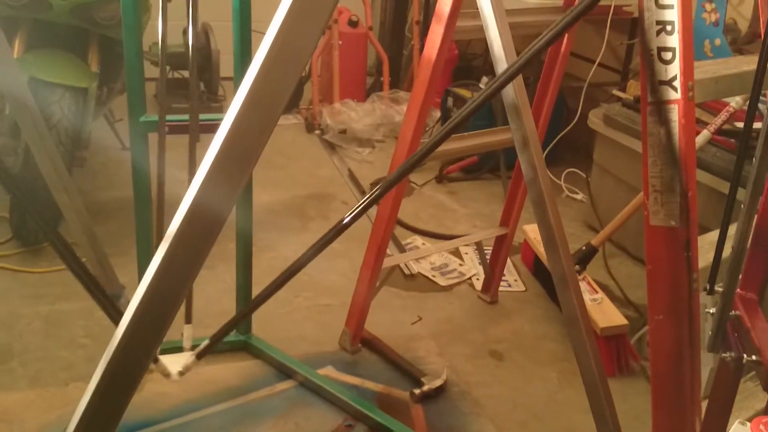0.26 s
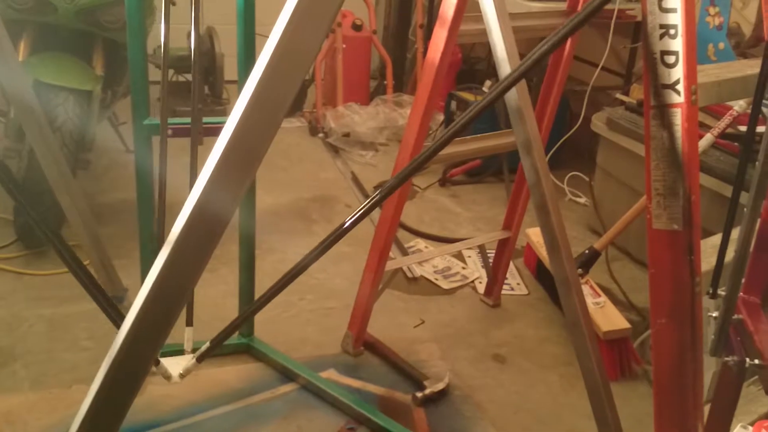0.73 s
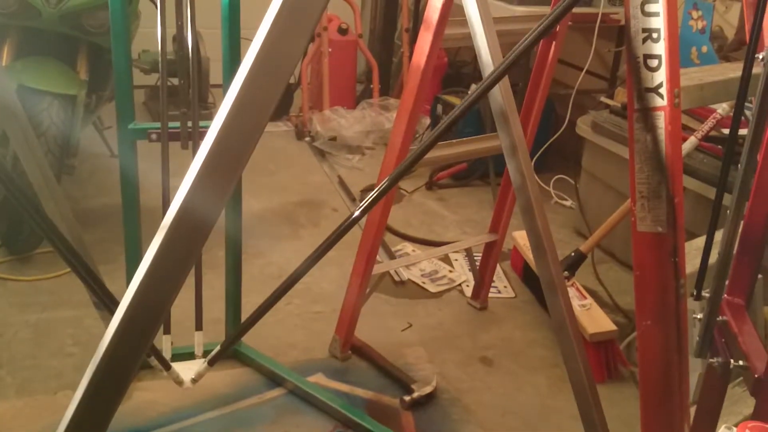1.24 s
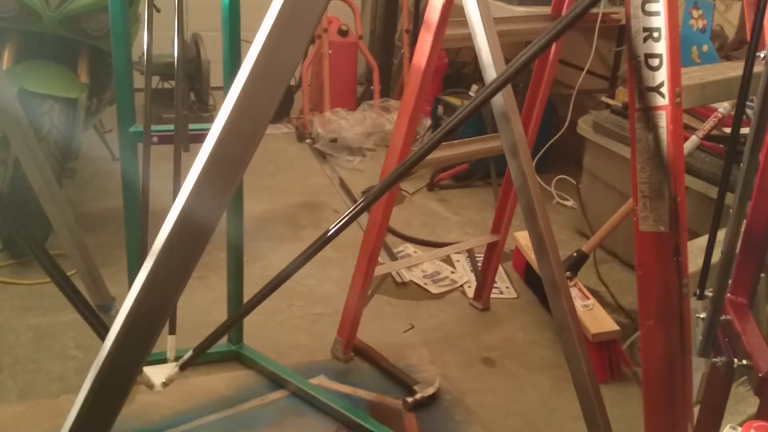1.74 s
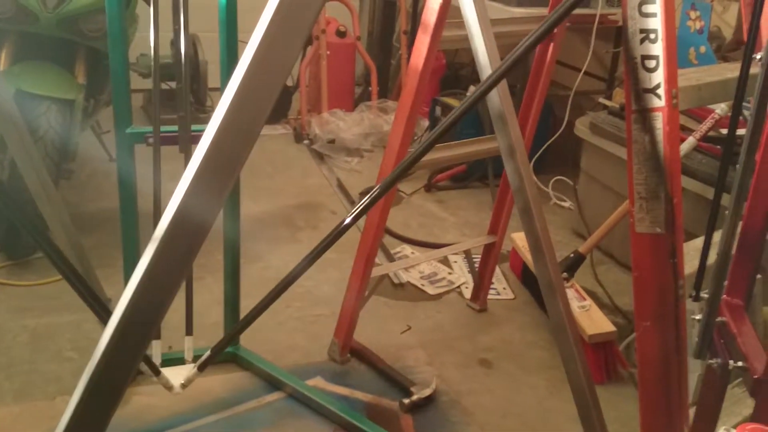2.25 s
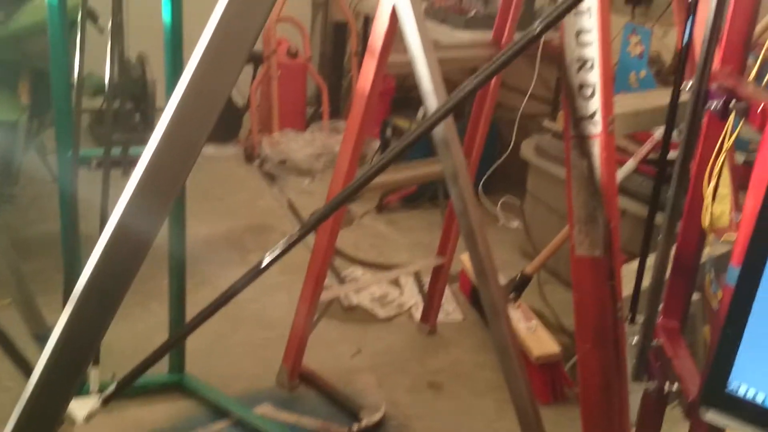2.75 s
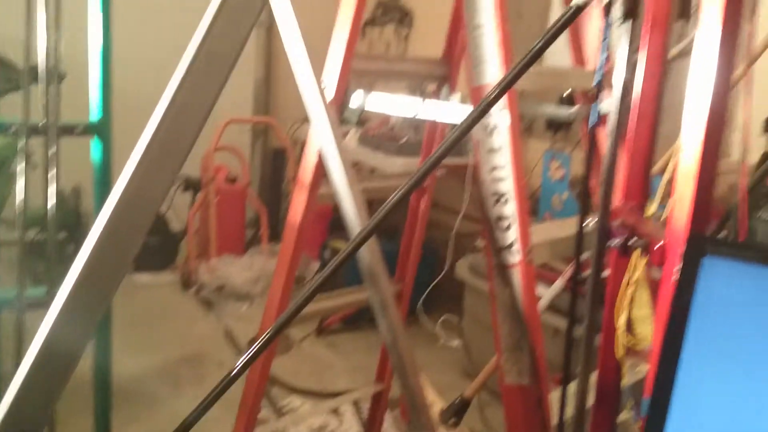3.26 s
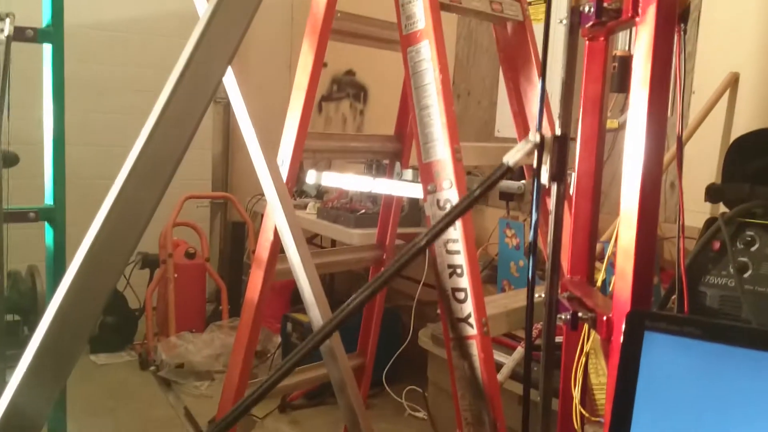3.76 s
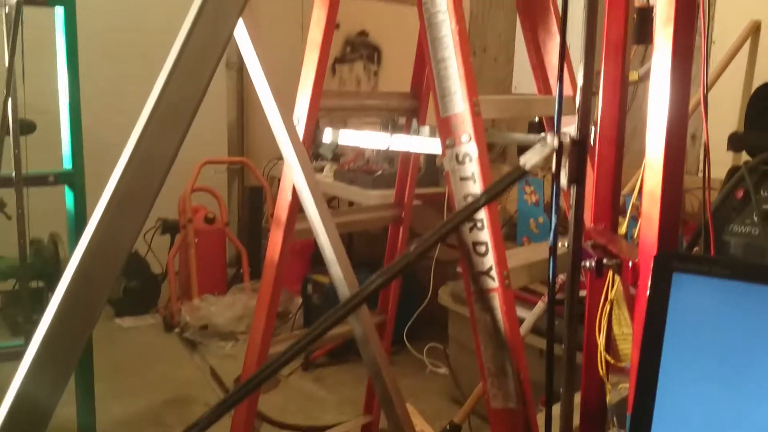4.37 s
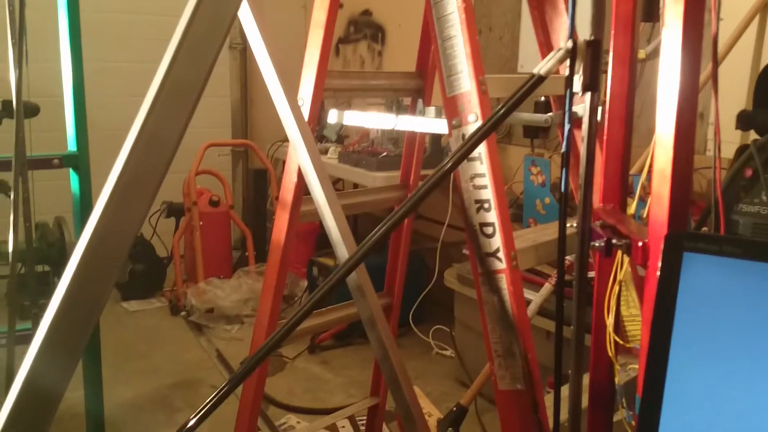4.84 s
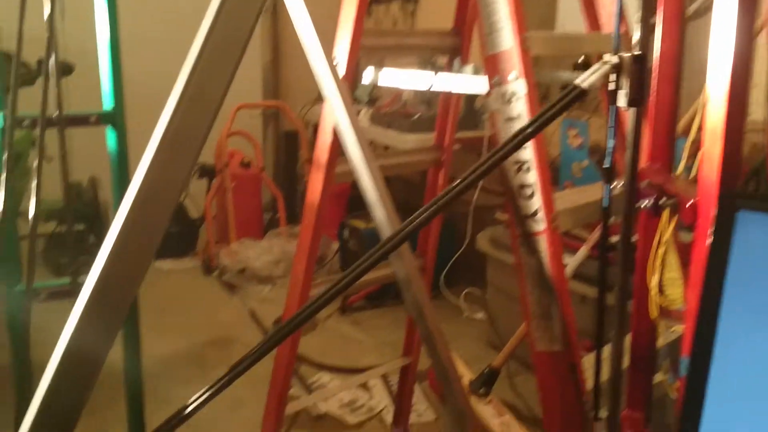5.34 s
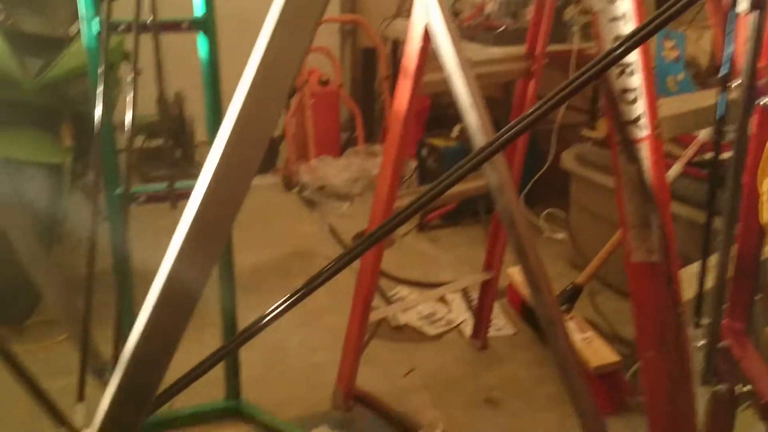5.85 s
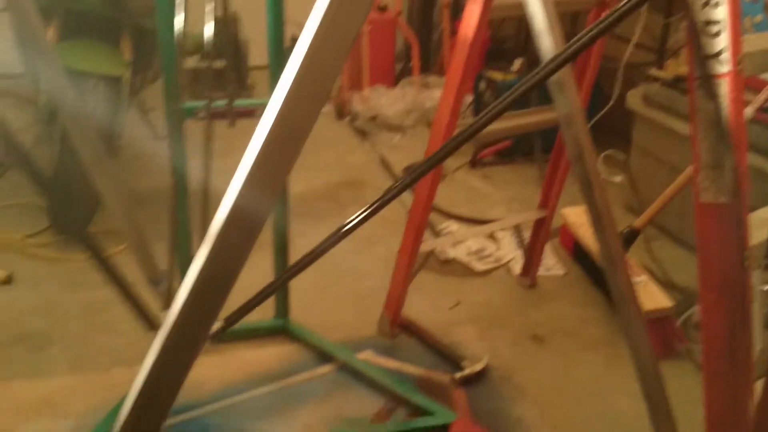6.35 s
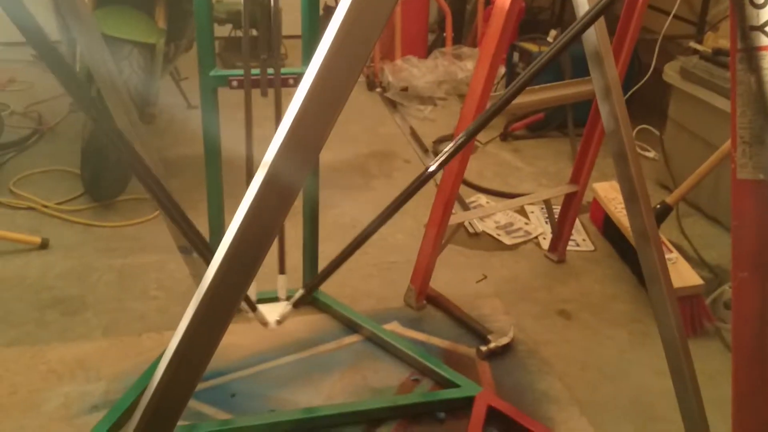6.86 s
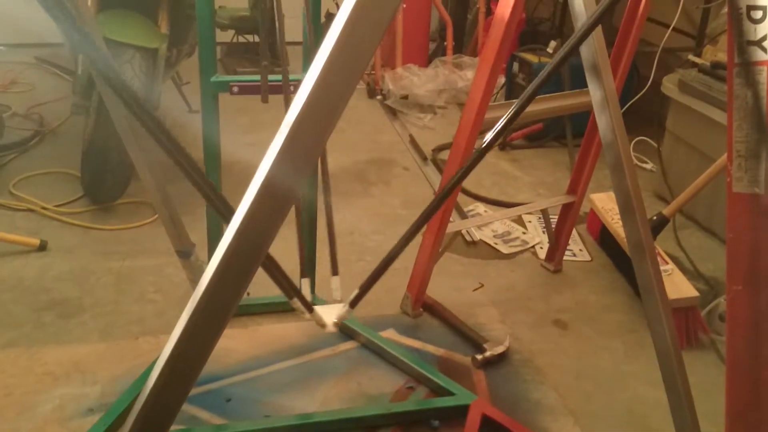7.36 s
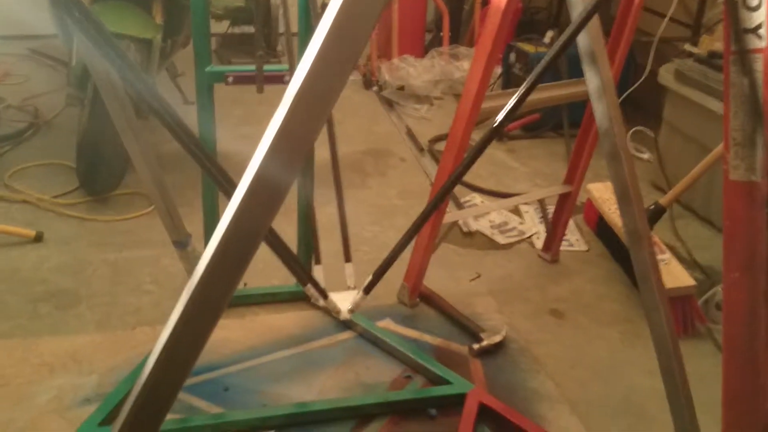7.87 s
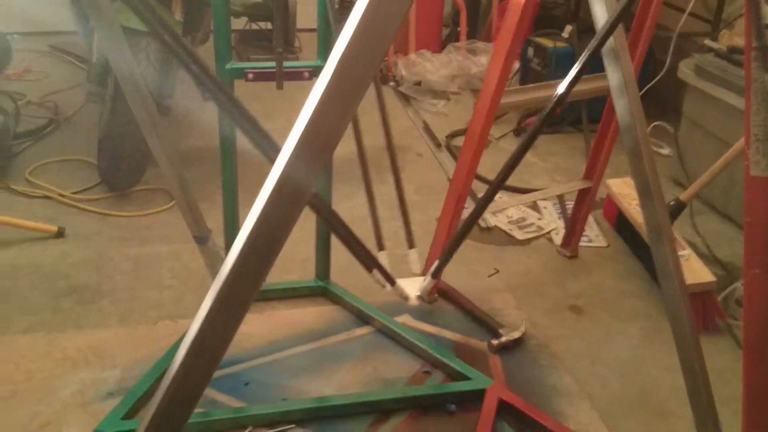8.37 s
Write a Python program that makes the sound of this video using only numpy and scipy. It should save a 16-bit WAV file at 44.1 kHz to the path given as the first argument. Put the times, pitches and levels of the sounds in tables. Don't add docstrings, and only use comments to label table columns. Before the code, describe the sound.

A rod-arm printer's stepper motors whine in short runs, pitch sliding down at each stop and jumping back up, in a garage.

```python
import sys
import numpy as np
from scipy import signal
from scipy.fft import rfft, irfft, next_fast_len
from scipy.io import wavfile
from scipy.ndimage import uniform_filter1d

SR = 44100
rng = np.random.default_rng(int(sys.argv[2]) if len(sys.argv) > 2 else 0)


def volts(x):
    e = np.asarray(x, float) / 20
    return 10 ** e


def to_wav(sig):
    pcm = np.clip(np.atleast_2d(sig), -1, 1) * 32767
    pcm = np.round(pcm).astype(np.int16)
    wavfile.write(sys.argv[1], SR, pcm.T)


N = 379701

STEP_HZ, BEAT_HZ = 1093.75, 178.35


def unit(x):
    return x / np.sqrt(np.mean(x ** 2))


def curves(table):
    s, *columns = np.transpose(table)
    return [np.interp(np.arange(N) / SR, s, c) for c in columns]


def panned(x, pan_db):
    return np.array([x * volts(pan_db / 2), x * volts(-pan_db / 2)])


def walk(rate):
    hold = int(SR / rate)
    steps = np.repeat(rng.standard_normal(N // hold + 1), hold)
    return 1.57 * uniform_filter1d(uniform_filter1d(steps, hold), hold)[:N]


def peaks(hz, modes):
    total = 0
    for k, (mode_hz, width_hz, db) in enumerate(modes):
        total = total + (-1) ** k * volts(db) / (1 + 1j * (hz ** 2 - mode_hz ** 2) / (hz * width_hz))
    return total


def shaped(x, gain):
    size = next_fast_len(N + SR)
    hz = np.arange(size // 2 + 1) * SR / size + 1e-3
    return irfft(rfft(x, size) * gain(hz), size)[..., :N]


def colour(points):
    hz, db = np.transpose(points)
    return lambda f: volts(np.interp(np.log(f), np.log(hz), db))


def add(out, s, sound):
    i = int(s * SR)
    out[:, i:i + sound.shape[1]] += sound[:, :N - i]


# (frequency [Hz], density [dB per Hz])
HISS_COLOUR = [(120, -24), (200, -29), (300, -10.5), (460, -7.5), (1000, -9), (1540, -14.5), (5500, -20),
               (6800, -17.5), (11400, -18.5), (14800, -13), (16500, -7)]
# (time [s], level [dB])
HISS_TURN = [
    (0, -1),
    (1.6, 1),
    (5.5, -0.5),
    (6.2, -2),
    (8.6, 0.5),
]
# (frequency [Hz], density [dB per Hz])
RUMBLE_COLOUR = [(15, -46), (25, -65), (59, 4), (113, -2.5), (156, -3), (188, 2.5), (260, -4.5), (340, -42),
                 (570, -120)]


def air():
    hiss = unit(shaped(rng.standard_normal((2, N)), colour(HISS_COLOUR)))
    shared = 1.1 * rng.standard_normal(N)
    rumble = unit(shaped(rng.standard_normal((2, N)) + shared, colour(RUMBLE_COLOUR)))
    hiss_db = -58 + curves(HISS_TURN)[0] + 0.49 * walk(7) + np.array([[-1], [1]])
    rumble_db = -77.5 + 1.6 * walk(9)
    return volts(hiss_db) * hiss + volts(rumble_db) * rumble


def garage(x):
    t60_s, first_echo_s = 0.56, .006
    t = np.arange(SR) / SR
    tail = rng.standard_normal((2, SR)) * np.exp(-np.log(1000) * t / t60_s) * (t > first_echo_s)
    return signal.fftconvolve(x, tail / np.sqrt(np.sum(tail ** 2) / 2), axes=1)[:, :N]


# (time [s], peak [dB], knock [Hz], t60 [s], thud [dB])
FINGER_BUMPS = [(0.719, -62, 306, 0.039, -6), (1.719, -79, 390, 0.075, 5), (2.749, -68, 308, 0.16, 7),
                (2.859, -49, 366, 0.058, 4), (2.976, -53.5, 393, 0.05, -8), (2.997, -54, 420, 0.062, -11),
                (3.016, -56, 410, 0.051, -12), (3.205, -58, 378, 0.069, -17), (3.247, -63, 405, 0.065, -8),
                (5.271, -76, 300, .1, 14), (5.61, -82, 300, .1, 12), (6.451, -66, 282, 0.032, 9),
                (6.919, -74, 269, 0.071, 13), (7.818, -73, 320, 0.089, 15), (7.89, -77, 323, 0.062, 20),
                (7.999, -81, 320, .08, 12), (8.107, -48.5, 358, 0.036, -7), (8.501, -37, 376, 0.055, 5),
                (8.529, -51.5, 364, 0.092, -1)]


def bumps():
    t, out = np.arange(SR // 4) / SR, np.zeros((2, N))
    port_lead_rad = np.array([[.4], [-.4]])
    for s, db, hz, t60, thud_db in FINGER_BUMPS:
        skin = rng.standard_normal(len(t)) + 0.74 * rng.standard_normal((2, len(t)))
        scuff = uniform_filter1d(uniform_filter1d(skin, size=24), size=16)
        press = np.minimum(t / 0.0035, 1) ** 2
        fall = press * np.exp(-np.log(1000) * t / t60)
        knock = panned(fall ** 1.4 * -np.cos(2 * np.pi * hz * (t - 0.0036)), 7) + 1.5 * fall * scuff
        sway = np.cos(2 * np.pi * 72 * t * (1 - 1.5 * t) - 1.9 + port_lead_rad)
        thud = -volts(thud_db - 6) * fall ** 0.6 * sway
        add(out, s, volts(db + 7.5) * (knock + thud * volts([[-1.5], [1.5]])))
    return shaped(out, lambda f: (1j * f / 40) ** 2 / (1 + 1j * f / 40) ** 2)


# (time [s], peak [dB], ring [Hz], t60 [s],
# left minus right [dB])
JOINT_TICKS = [(.7205, -41.5, 1500, 0.018, 1), (1.4437, -45, 5700, 0.027, -11), (1.4438, -42, 9200, .02, 2),
               (1.4446, -46.5, 2520, 0.033, 5), (1.4498, -46.5, 5200, .015, -14),
               (1.449, -48, 8800, 0.018, 0), (1.4518, -45, 2700, 0.019, 9), (1.8494, -45, 2620, 0.1, 5),
               (5.9805, -54, 5000, .02, -3), (5.9859, -41, 4700, 0.013, -7), (5.987, -42, 1090, .03, -3),
               (5.9982, -48, 5010, 0.025, -1), (6.006, -47.5, 1500, 0.021, -3),
               (6.050, -54, 3100, 0.035, -11), (7.8445, -50.5, 4900, 0.025, -14),
               (7.845, -45.5, 9300, 0.011, 0), (7.857, -51, 5000, .02, 0), (7.9381, -40, 4670, 0.016, -5),
               (7.9415, -52, 2400, .02, 0), (7.951, -56, 4500, 0.027, -3), (2.861, -56, 800, .02, 0),
               (3.0, -56, 700, .03, 0), (8.502, -42, 1300, 0.017, 0)]


def ticks():
    t, out = np.arange(SR // 8) / SR, np.zeros((2, N))
    for s, db, hz, t60, pan_db in JOINT_TICKS:
        crack = rng.standard_normal(len(t)) + 0.85 * rng.standard_normal((2, len(t)))
        ring = signal.lfilter(*signal.iirpeak(hz, 7, SR), crack)
        fall = volts(db - 10.5) * np.exp(-np.log(1000) * t / t60)
        add(out, s, panned(fall, pan_db) * (0.6 * crack + 8 * ring))
    return shaped(out, colour([(500, -12), (1000, 5), (3000, 1), (9500, -5), (12000, -12), (16000, -45)]))


# (time [s], length [s], pitch [Hz], level [dB])
ROLLER_DRAGS = [
    (3.67, .17, 2175, -63),
    (3.7, 0.15, 2050, -65),
    (7.53, 0.085, 2270, -58),
]


def drags():
    out, waver = np.zeros((2, N)), walk(30.25)
    for k, (s, length, hz, db) in enumerate(ROLLER_DRAGS):
        t = np.arange(int(length * SR)) / SR
        own = waver[k * SR:][:len(t)]
        swell = np.sin(np.pi * (t / length) ** 0.6)
        tone = np.sin(2 * np.pi * hz * t + 1.8 * own)
        add(out, s, panned(volts(db + 1 + 2.0 * own) * swell * tone, 0))
    return out


def moves():
    return [-1] + [row[0] for row in STEP_LAUNCHES], [row[0] for row in STEP_BRAKES] + [N / SR]


def cruising():
    starts, stops = moves()
    t = np.arange(N) / SR
    speed = 0
    for a, b in zip(starts[:-1], stops[:-1]):
        speed = speed + np.interp(t, [a + 0.025, a + 0.09, b, b + 0.19], [0, 1, 1, 0])
    return speed


# (fifth harmonic [dB], third harmonic [dB], rail ring [dB], rattle [dB], upper beats [dB])
MOVE_LEVELS = [(-60.5, -58, 0.5, -55.5, -4), (-60, -67, 0.5, -55, 0), (-59.5, -57, 0, -55, -9),
               (-61, -60, -3.5, -55.5, -10), (-60.5, -61, 5, -55.5, -5), (-64, -63, 4.5, -55, -3.5),
               (-57.5, -66, 4.5, -54.5, -8), (-70, -61.5, 4.5, -53.5, -2.5), (-61, -58.5, 2.5, -55.5, -2),
               (-58, -70, 1, -53.5, 3.5), (-58, -66, 3, -55, 4), (-68, -70, -10, -54, 0)]
# (time [s], half length [s], level [dB])
RAIL_SWELLS = [
    (.67, 0.035, 2),
    (2.06, 0.073, 4.5),
    (2.88, .04, 3),
    (6.107, 0.038, -5),
    (3.724, 0.082, 2),
    (4.04, 0.18, -1),
    (7.22, 0.079, 1.5),
    (7.537, 0.052, 2.5),
    (8.354, 0.049, 3.5),
]


def travel():
    t = np.arange(N) / SR
    creep_s, speed_up_s = 0.064, 0.04
    slow_s, halt_s, die_s = 0.11, 0.16, 0.12
    swell_db = sum(db * np.exp(-((t - s) / half) ** 2) for s, half, db in RAIL_SWELLS)
    rattle, fizz = [], []
    for a, b, row in zip(*moves(), MOVE_LEVELS):
        up = a + speed_up_s
        b = max(b, up)
        rattle_s = [a - creep_s - .035, a - creep_s, up, b, b + slow_s, b + halt_s, b + halt_s + die_s]
        rattle.append(row[3] + np.interp(t, rattle_s, [-17, -3.5, 0, 0, 0, -5.5, -17]))
        powered = np.interp(t, [a - .11, a - .08, up, b + 0.21], [-10, -2.5, 0, -.6])
        fizz.append(row[3] - 10.5 + np.where(t > b + 0.14, -10, powered))
    return np.max(rattle, axis=0) + swell_db, np.max(fizz, axis=0) + swell_db


# (frequency [Hz], density [dB per Hz])
RATTLE_COLOUR = [(450, -17), (800, -16.5), (1200, -6), (2400, -5), (3600, -4.5), (5400, 0), (6200, -6.5),
                 (6700, -11.5), (9000, -16)]
# (frequency [Hz], width [Hz], level [dB])
RAIL_MODES = [(1981, 52, 2.5), (2762, 10, 8), (3017, 8, 12.5), (3993, 14, 5.5), (6060, 130, -0.5)]
# (frequency [Hz], density [dB per Hz])
FIZZ_COLOUR = [(3820, -54), (6500, -20), (6770, -13), (7300, -6), (9080, 2), (10900, -3.5), (13400, -8.5),
               (14900, 1), (15500, -29)]


def carriages():
    rattle_db, fizz_db = travel()
    slow = 1 - cruising()
    hum_db = rattle_db + 5 * slow
    drone_db = rattle_db - 29.0 + 14 * slow
    beat = 2 * np.pi * BEAT_HZ * np.arange(N) / SR
    chatter = volts(.3 * np.sin(beat) + .35 * np.sin(2 * beat) + .8 * walk(120) + .7 * walk(12))
    rattle = shaped(chatter * rng.standard_normal((2, N)),
                    lambda f: colour(RATTLE_COLOUR)(f) * (1 + np.abs(peaks(f, RAIL_MODES))))
    shake = rng.standard_normal(N) + 0.13 * rng.standard_normal((2, N))
    panel = colour([(450, -20), (620, 0), (1100, 0), (1400, -20)])
    hum = shaped(shake, lambda f: peaks(f, FRAME_MODES) + volts(-19.5) * panel(f))
    fizz = shaped(chatter ** 1.06 * volts(0.47 * walk(9.8)) * rng.standard_normal((2, N)), colour(FIZZ_COLOUR))
    drone = shaped(shake, lambda f: peaks(f, [(302.0, 45, 0)]) ** 2)
    out = unit(rattle) * volts(rattle_db + np.array([[2.2], [3.2]]))
    out += unit(hum) * volts(hum_db + np.array([[-15], [-12]]))
    out += unit(fizz) * volts(fizz_db + np.array([[1.6], [2.6]]))
    return out + unit(drone) * volts(drone_db + np.array([[2.5], [-1.5]]))


# (time [s], peak [dB], left minus right [dB])
STEP_LAUNCHES = [(0.722, -35, -5), (1.622, -36, -3), (2.103, -35, -2), (2.495, -37.5, -4), (2.94, -35.5, 0),
                 (3.423, -39, -4), (4.423, -39.5, -3.5), (5.108, -37, -4.5), (6.186, -35, -6),
                 (8.08, -34, -5), (8.571, -31.5, -1.5)]
# (time [s], level [dB], left minus right [dB])
STEP_BRAKES = [(.503, -39, -2), (.984, -41, -4.5), (1.834, -42, -6), (2.262, -41.5, -4), (2.709, -41, -6),
               (3.194, -41.5, -4), (4.212, -44, -4.5), (4.854, -41.5, -4.5), (5.439, -43, -4.5),
               (7.535, -43.5, -3), (8.321, -42, -4)]
# (share of the glide rate [ratio], offset [Hz], level [dB])
GLIDE_STRANDS = [(1, 0, 0), (.75, -20, -8), (1.35, -10, -12), (.7, -165, -8), (.8, -330, -21)]
# (frequency [Hz], width [Hz], level [dB])
FRAME_MODES = [(636, 41, -1.5), (825, 31, 2), (904.3, 32.4, 6), (918, 7.1, 4.5), (923, 11, -12),
               (1012, 110, 4), (684, 11.7, 2.5), (970, 17, -3.5)]


def sweeps():
    t, force = np.arange(SR // 3) / SR, np.zeros((2, N))
    launch_hz, launch_s = 930, .032
    lead_in_s, lead_in_db = .022, -15
    ring_up_s = .001
    up_hz = (STEP_HZ - launch_hz) * np.maximum(1 - (t - lead_in_s) / launch_s, 0)
    cut_in = np.interp(t, [0, lead_in_s, lead_in_s + .002], [0, volts(lead_in_db), 1])
    up_fade = np.exp((lead_in_s - t) / .045) * cut_in
    down_hz = 3500 * t
    down_fade = np.exp(-(t / 0.082) ** 3) * np.minimum(t / 0.01, 1)
    launching = (STEP_LAUNCHES, up_hz, up_fade, lead_in_s + ring_up_s)
    braking = (STEP_BRAKES, down_hz, down_fade, 0)
    for events, below_hz, fade, early_s in (launching, braking):
        for s, db, pan_db in events:
            for share, offset_hz, strand_db in GLIDE_STRANDS:
                hz = np.maximum(STEP_HZ + offset_hz - share * below_hz, 50)
                tone = np.sin(2 * np.pi * np.cumsum(hz) / SR + .4 * rng.standard_normal((2, 1)))
                add(force, s - early_s, panned(volts(db + strand_db - 3.5) * fade, pan_db) * tone)
    force *= 1 + .15 * walk(90)
    body = lambda f: 1 / (1 + 1j * (f ** 2 - 1000 ** 2) / (f * 480))
    return shaped(force, lambda f: volts(-6) * peaks(f, FRAME_MODES) + body(f))


# (time [s], step tone [dB], left minus right [dB], belt load [0-1])
NEAREST_MOTOR = [(0, -47, -5.5, 0.07), (.5, -48.5, -3.5, 0), (.8, -56.5, -3, 0.46), (.99, -53, -3, 0.76),
                 (1.7, -48.5, 1, 0), (2.2, -55.5, 0, 0), (2.6, -50.5, 2, 0), (3.02, -57, 2, 0.5),
                 (3.2, -54, -6, 0.79), (3.45, -54, -1, 0.01), (3.7, -50, 0, 0), (4.21, -47.5, 0, 0),
                 (4.5, -53.5, 7.5, 0.1), (4.75, -53, -5, 0.88), (5.19, -56, 5, 0.4),
                 (5.45, -46.5, 3.5, 0.18), (6.3, -58.5, -1, 0.8), (7.25, -54, -8, 0.88),
                 (7.5, -55.5, -6, 0.85), (8.2, -55.5, -2, 0.5)]
# (time [s], half length [s], level [dB])
TONE_SAGS = [
    (1.7, 0.074, -3),
    (2.56, 0.067, 2),
    (3.57, 0.083, -8),
    (8.42, 0.054, -5),
]
# (time [s], half length [s], level [dB])
ARM_SLACKS = [
    (6.5, 0.071, -4),
    (6.9, 0.22, -12),
    (7.42, 0.091, -9),
    (8.17, 0.09, -11),
]
# (lower fourth beat [dB], upper fourth beat [dB], upper left lead [rad], left minus right [dB])
FOURTH_BEATS = [(-62.5, -65, -.8, -11), (-62, -63, -.9, -10), (-62, -62.5, 0, -10), (-68, -69, 0, -5),
                (-64, -66, .9, -10), (-73, -66, .6, 0), (-65.5, -66, 2.5, -2), (-65, -73, 2.5, -2),
                (-63.5, -70, .2, 0), (-70, -65, -.6, 4), (-70, -67, -.7, 2), (-72, -72, 0, 0)]
PORT_LEADS = [(-.2, .9, -.9, -2, 2.5), (-.9, 1.4, -1.4, -1.8, 2.5), (0, 1.5, -2.8, -1, 2.3),
              (-.4, 1.5, .6, -2.4, 2.6), (-.2, 2, -2.6, -.2, 2.5), (-2.1, -2.4, -2.4, 1.4, 1.1),
              (-2.5, -2.9, -1, .7, 3.1), (-1.7, -2.4, -1.4, .5, 2.1), (-1.9, -3.1, -1.7, .7, 1),
              (-.8, 2.3, -2.3, -2.6, -1.6), (-.3, -2.8, -2, -2.3, -1.1), (0, 0, 0, 0, 0)]
# (fifth [dB], rail ring [dB], upper beats [dB])
LINE_BALANCES = [(10, 2, -3), (3, 5, 3), (5, -1, -3), (2, 3, -3), (8, 5, 0), (9, 4, 5), (0, 0, 0),
                 (-9, 4, 7), (-2, 6, -2), (-2, -4, -3), (-5, -3, -2), (0, 0, 0)]


def line_levels():
    t = np.arange(N) / SR
    step_db, pan_db, load = curves(NEAREST_MOTOR)
    starts, stops = np.array(moves())
    k = np.searchsorted(starts, t) - 1
    by_move = lambda table: uniform_filter1d(1. * np.transpose(table)[:, k], size=400)
    fifth_db, third_db, rail_db, _, upper_db = by_move(MOVE_LEVELS)
    low_db, high_db, high_lead, high_pan = by_move(FOURTH_BEATS)
    leads = by_move(PORT_LEADS)
    lock_db = -20 * np.clip(1 - (t - starts[k]) / .075, 0, 1)
    braked_s = np.maximum(t - stops[k], 0)
    fading = lambda fall_db_s: uniform_filter1d(lock_db - fall_db_s * braked_s, size=200)
    dips = lambda table: sum(db * np.exp(-((t - s) / half) ** 4) for s, half, db in table)
    near = [step_db + dips(TONE_SAGS) + fading(91),
            fifth_db + fading(167),
            -63 + 12 * load + rail_db + fading(62.5)]
    upper_beats_db = -75 + 18.5 * load + upper_db + dips(ARM_SLACKS)
    far = [upper_beats_db, -71 + 14 * load, third_db, -67.5 + 7.5 * load, low_db, high_db]
    levels_db = near + [db - 26 * (1 - cruising()) for db in far]
    pans_db = [pan_db, *by_move(LINE_BALANCES), 0, 0, 0, 0, high_pan]
    return levels_db, pans_db, [*leads[:3], .7, *leads[3:], 0, 1.6, high_lead]


# (multiple of step, multiple of beat, level in family [dB], left minus right [dB])
LINE_FAMILIES = [
    [(1, 0, 0, 0)],
    [(5, 0, 0, 0)],
    [(2, -1, -2, 0), (2, -1.065, -11.5, 0), (2, 0, -15, 0)],
    [(1, 2, 0, 3), (2, -2, -2.5, 0), (1, -2, -10, 0), (2, 1, -10, 0), (2, -3, -10, 0)],
    [(3, 1, 2, -5), (3, -2, -6, -4), (3, -1, -9, -4), (4, 0, -8, -12), (4, -2, -9, -5), (3, 2, -9, 0),
     (2, 2, -11, 0)],
    [(3, 0, 0, 0)],
    [(1, -1, 0, -6), (1, 1, -7, 1)],
    [(4, -1, 0, -3), (5, -1, -5, 0)],
    [(4, 1, 0, 0)],
]
LINE_FLUTTER = [.3, 1.0, 1.4, 1, .8, .8, 1.2, 1.1, 1.1]


def whine():
    levels_db, pans_db, leads = line_levels()
    t, out = np.arange(N) / SR, np.zeros((2, N))
    for k, (family, level_db) in enumerate(zip(LINE_FAMILIES, levels_db)):
        wobble, flutter_db = 0.076 * walk(13), LINE_FLUTTER[k] * walk(18)
        for step, beat, db, side_db in family:
            hz = step * STEP_HZ + beat * BEAT_HZ
            phase = 2 * np.pi * (hz * t + rng.random()) + wobble
            drift = walk(1.92)
            lag = leads[k] + (.25 if k else .05) * drift
            balance_db = side_db + pans_db[k] + (1.5 if k else 0) * np.roll(drift, SR)
            own_flutter_db = np.roll(flutter_db, int(step * 9000 + beat * 5000))
            gain = panned(np.sqrt(2) * volts(level_db + db + own_flutter_db), balance_db)
            out += gain * np.sin([phase + lag / 2, phase - lag / 2])
    return out


def scene():
    glides, cracks = sweeps(), ticks()
    room = garage(glides + volts(-5) * cracks)
    return air() + room + bumps() + cracks + drags() + carriages() + glides + whine()


def low_pass(x):
    return signal.sosfilt(signal.butter(12, 17010, fs=SR, output="sos"), x)


# (frequency [Hz], left minus right [dB])
PORT_COLOUR = [(40, 4), (110, 2), (200, -0.5), (6500, 0), (9000, 3.5), (11000, 3), (13000, -1.5),
               (15000, -3.5)]


def record(dry):
    side = np.array([[.5], [-.5]])
    mix = shaped(dry, lambda f: (f < 15790) * colour(PORT_COLOUR)(f) ** side)
    return low_pass(mix)


dry = scene()
out = record(dry)
to_wav(out)
```